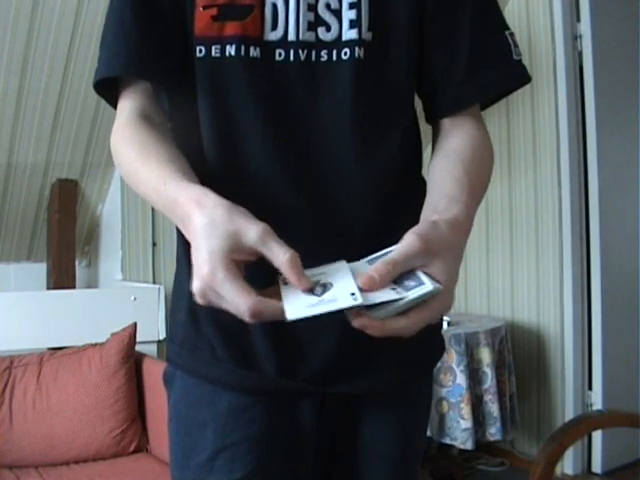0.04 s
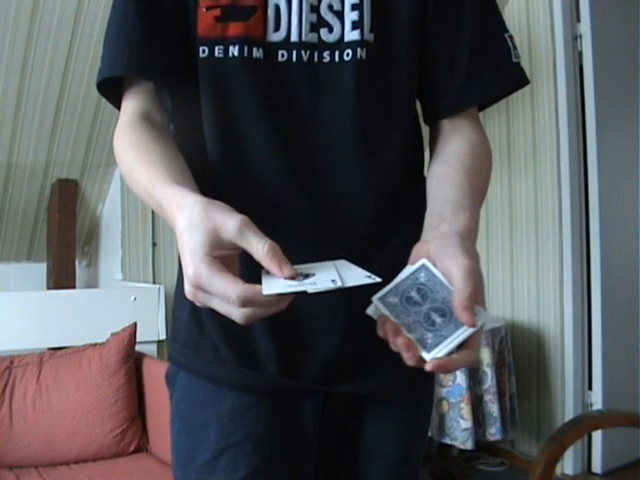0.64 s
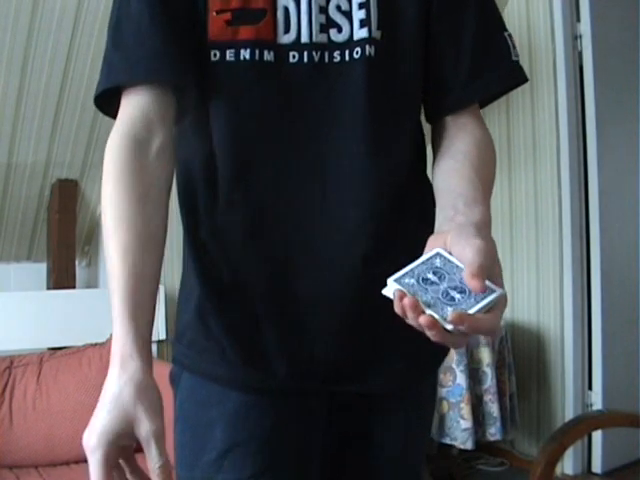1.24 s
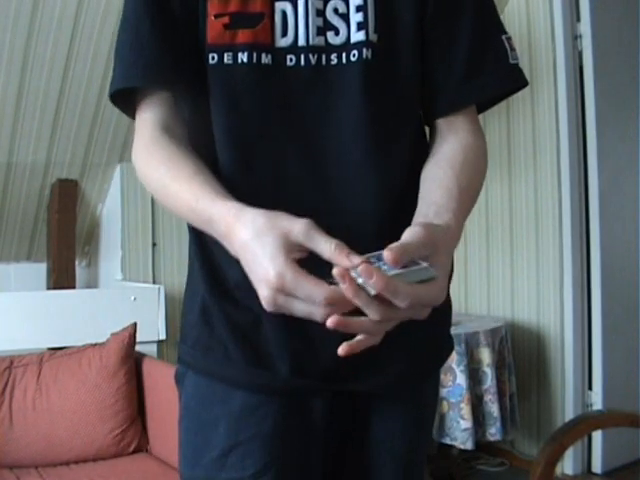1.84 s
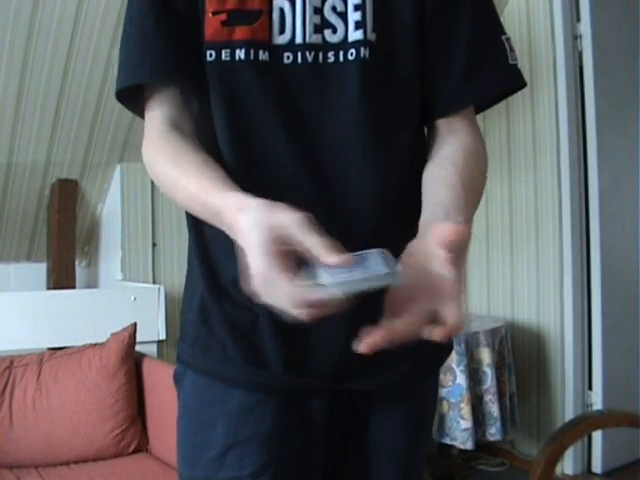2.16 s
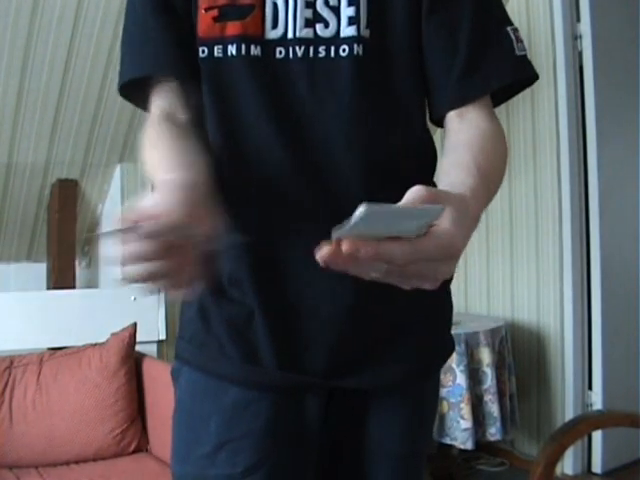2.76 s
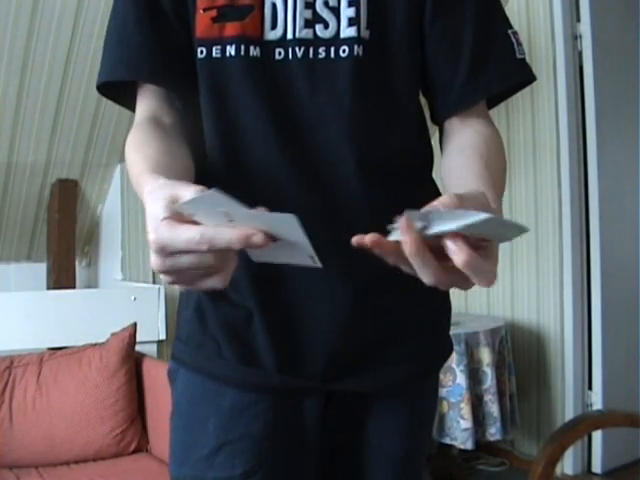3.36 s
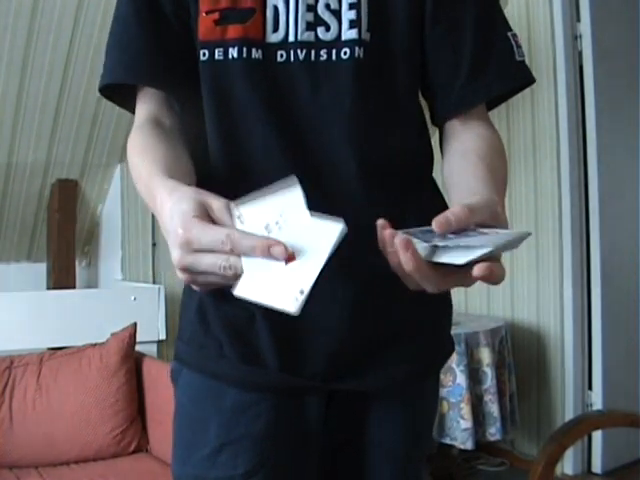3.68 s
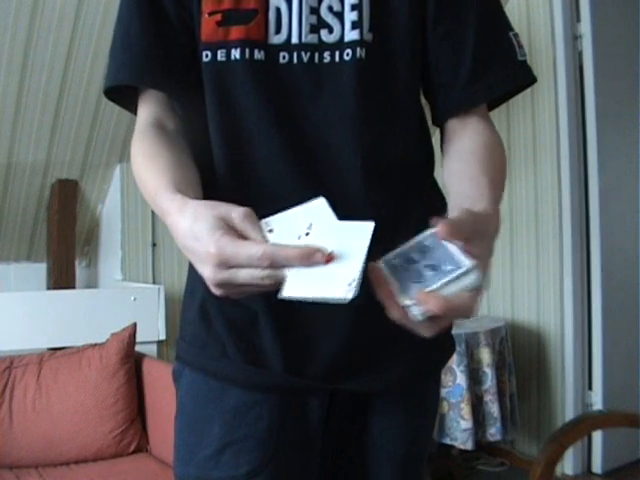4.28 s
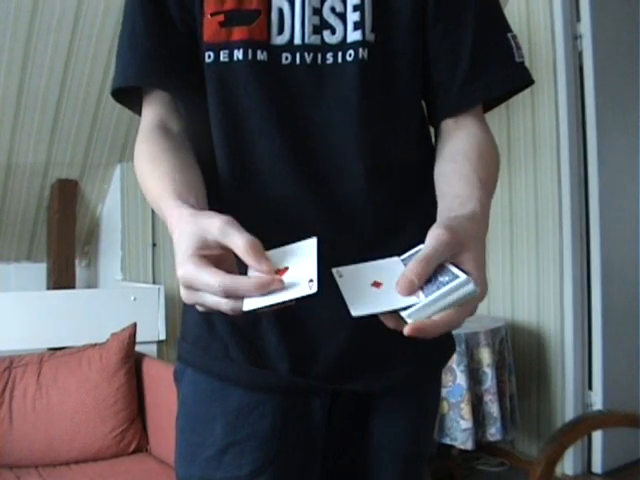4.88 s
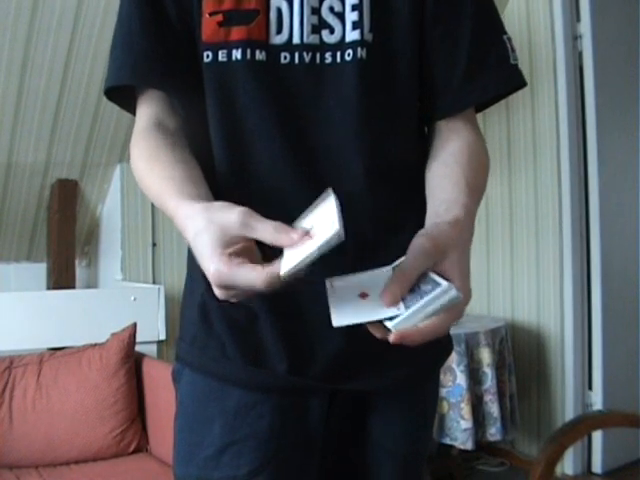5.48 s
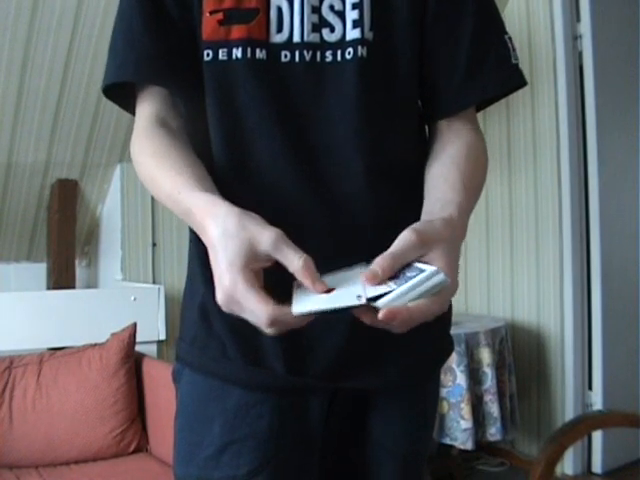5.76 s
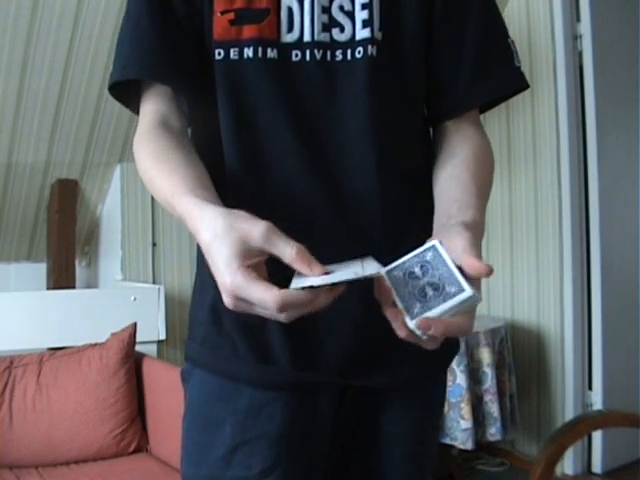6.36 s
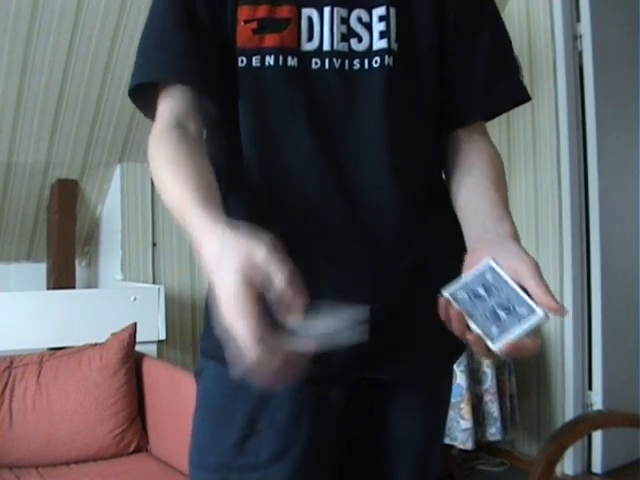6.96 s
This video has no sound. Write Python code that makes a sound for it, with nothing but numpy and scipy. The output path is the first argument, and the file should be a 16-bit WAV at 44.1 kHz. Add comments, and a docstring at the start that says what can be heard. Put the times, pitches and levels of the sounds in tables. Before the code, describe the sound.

Playing cards are handled near the microphone in a small room with short, close reflections. A faint fan murmur and a thin microphone whine run underneath. Soft card rubs and light ticks fill the first second. At about 1.6 seconds a packet claps hollowly into the palm with a few clicks. Small ticks come near 2.4 seconds and a brisk slide with a snap at 2.8, followed by a very faint fingertip squeak around 3.2 and a tiny edge zip at 3.6. From 4.7 seconds the rubs and clicks grow busier. A loud snap at 5.3 thumps the microphone with a puff of air, and a quick cluster of sharp snaps peaks at 5.6. Lighter ticks and soft slides trail off until about 7 seconds. Something close to the microphone knocks lightly at about 1, 4.4 and 6 seconds.

```python
"""Playing cards handled in a small room: they rub off the deck, snap and tick as they flick, touch and
settle, and clap into the palm as a packet. A fingertip squeaks, an edge zips, and one loud snap's puff
of air thumps the microphone. Walls and furniture answer within milliseconds. A fan murmurs,
the microphone whines faintly, and something close to it knocks lightly three times."""
import sys
import numpy as np
from scipy import signal
from scipy.fft import rfft, irfft
from scipy.io import wavfile

SR = 44100
rng = np.random.default_rng(int(sys.argv[2]) if len(sys.argv) > 2 else 0)


def store_pcm(level_fs):
    """Save levels as 16-bit WAV."""
    pcm = np.round(np.clip(level_fs, -1, 1) * 32767).astype(np.int16)
    wavfile.write(sys.argv[1], SR, np.atleast_2d(pcm).T)


N = 310023
TIME = np.arange(N) / SR


def amp(db):
    """Decibels to gain."""
    return 10 ** (np.asarray(db) / 20)


def unit(x):
    """Scale to rms 1."""
    return x / np.sqrt(np.mean(x ** 2) + 1e-20)


def curve_at(points, hz):
    """Interpolate a table over log frequency."""
    freq_hz, value = np.transpose(points)
    return np.interp(np.log(hz + 1), np.log(freq_hz + 1), value)


def pulse(spectrum, size=2048):
    """Minimum-phase pulse with the given spectrum, peak 1."""
    log_gain = np.log(amp(curve_at(spectrum, abs(np.fft.fftfreq(size, 1 / SR)))))
    wave = np.fft.ifft(np.exp(np.conj(signal.hilbert(log_gain)))).real[:size // 2]
    return wave / abs(wave).max()


def strike(starts_s, levels_db, sound):
    """One copy of the sound per start and level."""
    blows = np.zeros(N)
    blows[np.round(np.asarray(starts_s) * SR).astype(int)] = amp(levels_db)
    return signal.oaconvolve(blows, sound)[:N]


def ring(modes, size=16384):
    """Sum of decaying sines."""
    t = TIME[:size]
    return sum(amp(db) * np.exp(-np.log(1000) * t / t60_s) * np.sin(2 * np.pi * hz * t)
               for hz, db, t60_s in modes)


def stereo_pair(a, b, correlation):
    """Two correlated channels from two independent signals."""
    mid = a * np.sqrt((1 + correlation) / 2)
    side = b * np.sqrt((1 - correlation) / 2)
    return np.array([mid + side, mid - side])


# noise floor: freq_hz, density_db
FLOOR_SPECTRUM = [(20, -7.5), (42, -3), (60, 5.5), (85, -7), (160, -7), (330, -7.5), (750, -8),
                  (1400, -11.5), (2000, -13.5), (4400, -19.5), (7300, -22.5), (10000, -28), (14000, -34.5),
                  (16000, -41)]
# its stereo width: freq_hz, correlation
FLOOR_CORRELATION = [(30, 0.72), (65, .95), (110, 0.65), (190, -0.77), (330, -0.099), (780, -0.3),
                     (940, 0.19), (1250, -0.79), (1700, -0.069), (4000, -0.3), (9000, 0.23)]
# its balance: freq_hz, left_minus_right_db
FLOOR_BALANCE = [(60, 0.5), (180, 0.5), (550, 2.5), (1650, 2.5), (4970, -1.5), (15000, -2.5)]
# fan housing resonances: freq_hz, width_hz, lift_db
FAN_RESONANCES = [(315.3, 5.9, 10), (594.5, 27, 7.5), (938.4, 29, 7.5), (999, 116, 9.5), (1646, 100, 6),
                  (1997, 83, 6), (2710, 115, 6)]
# electrical whines: pitch_hz, level_db
WHINES = [(2697, -77), (3090, -77.5), (3736, -78.5), (5448, -81), (7736, -80), (10557, -88)]
def background(floor_db=-51, waver_db=.5, waver_hz=12, whine_trim_db=-1):
    """Room rumble, a fan in its resonant housing, microphone hiss and thin whines."""
    hz = np.fft.rfftfreq(N, 1 / SR)
    fan_db = sum(lift_db / (1 + (2 * (hz - freq_hz) / width_hz) ** 2)
                 for freq_hz, width_hz, lift_db in FAN_RESONANCES)
    colour_db = curve_at(FLOOR_SPECTRUM, hz) + fan_db
    balance_db = np.array([[.5], [-.5]]) * curve_at(FLOOR_BALANCE, hz)
    noise = stereo_pair(*rfft(rng.standard_normal((2, N))), curve_at(FLOOR_CORRELATION, hz))
    floor = unit(irfft(noise * amp(colour_db + balance_db), N))
    waver = unit(irfft(rfft(rng.standard_normal(N)) / (1 + (hz / waver_hz) ** 2), N))
    whine = sum(amp(db + whine_trim_db) * np.sin(2 * np.pi * (pitch_hz * TIME + rng.random()))
                for pitch_hz, db in WHINES)
    return amp(floor_db + waver_db * waver) * floor + np.sqrt(2) * whine


def friction(spectrum, grains_per_s, smooth, grit_db=3):
    """Paper fibres catch and let go: uneven tiny clicks over a smooth rub."""
    catches = (rng.random(N) < grains_per_s / SR) * rng.standard_normal(N)
    catches *= amp(grit_db * rng.uniform(-1.8, 1.8, N))
    rub = unit(catches) + smooth * rng.standard_normal(N)
    return unit(signal.oaconvolve(rub, pulse(spectrum))[:N])


def stroke(peak_s, rise_s, fall_s, drop_db=13):
    """A rub speeds up and slows: its sample span and relative speed."""
    span = slice(*np.searchsorted(TIME, [peak_s - 4 * rise_s, peak_s + 4 * fall_s]))
    from_peak = np.maximum((peak_s - TIME[span]) / rise_s, (TIME[span] - peak_s) / fall_s)
    return span, amp(-drop_db * from_peak ** 1.05)


def stirring(swing_db=5.5, knots_per_s=4.05):
    """Restless fingers: a randomly wandering gain."""
    knots = rng.standard_normal(256)
    return amp(swing_db * np.interp(TIME * knots_per_s, np.arange(len(knots)), knots))


# card rubbing on card: peak_s, length_s, hiss_db, rasp_over_hiss_db
SLIDES = [(.005, .044, -55, 5.5), (0.164, 0.12, -49.5, -1), (0.423, .025, -47.5, -2.5),
          (0.449, .06, -53, 0.5), (0.955, 0.032, -57.5, -4), (.99, 0.036, -58, -12),
          (1.435, 0.053, -61.5, -9), (1.572, 0.12, -56, 1), (1.981, 0.067, -54.5, -3),
          (2.044, .05, -56.5, 3), (2.814, 0.065, -39, -3.5), (2.826, .024, -31.5, 3),
          (2.863, 0.055, -48.5, 6.5), (3.114, 0.023, -53, 7.5), (3.21, .028, -55, -7),
          (3.416, 0.15, -59, 5), (3.617, 0.088, -48, -3), (4.724, 0.048, -51, 10.5),
          (4.84, 0.14, -57.5, 1.5), (4.881, 0.039, -46.5, 1.5), (4.928, 0.049, -46.5, 1.5),
          (5.095, 0.11, -59, 4.5), (5.296, 0.074, -45.5, 1), (5.321, 0.016, -32, 4), (5.562, .022, -28, 0),
          (5.597, 0.044, -40, 12), (5.73, 0.026, -38.5, 1), (5.823, 0.16, -58, 3), (5.966, 0.064, -55, -15),
          (6.108, 0.13, -59, 4.5), (6.205, 0.1, -50.5, 2), (6.438, 0.034, -58.5, 3),
          (6.973, 0.063, -49, -15)]
# short rub at each snap: rise_s, fall_s, hiss_over_crack_db, rasp_over_pop_db
RELEASE_RUB = (0.0115, 0.03, -30.5, -13)
# low and high friction bands: freq_hz, level_db
RASP_SPECTRUM = [(60, -29), (200, -3.5), (400, -6), (900, 0.5), (1700, 6), (3000, 3.5), (4200, -0.5),
                 (8000, -50.5)]
HISS_SPECTRUM = [(1000, -20.5), (2800, -3.5), (3800, 2), (5200, 1.5), (7200, 3.5), (9500, -2), (12500, -5),
                 (15000, -19)]
def slides(rise_share=.47, rasp_trim_db=-7, hiss_trim_db=-1.5, stir_rasp_db=-73, stir_hiss_db=-72):
    """Friction of sliding cards, of each snap's release and of the fingers in between."""
    rubs = [(peak_s, length_s * rise_share, length_s * (1 - rise_share), hiss_db, hiss_db + over_db)
            for peak_s, length_s, hiss_db, over_db in SLIDES]
    rise_s, fall_s, hiss_over_db, rasp_over_db = RELEASE_RUB
    rubs += [(start_s, rise_s, fall_s, crack_db + hiss_over_db, pop_db + rasp_over_db)
             for start_s, crack_db, pop_db, _ in SNAPS]
    stir = stirring()
    rasp_power = (amp(stir_rasp_db) * stir) ** 2
    hiss_power = (amp(stir_hiss_db) * stir) ** 2
    for peak_s, rise_s, fall_s, hiss_db, rasp_db in rubs:
        span, speed = stroke(peak_s, rise_s, fall_s)
        rasp_power[span] += (amp(rasp_db + rasp_trim_db) * speed) ** 2
        hiss_power[span] += (amp(hiss_db + hiss_trim_db) * speed) ** 2
    rasp = np.sqrt(rasp_power) * friction(RASP_SPECTRUM, grains_per_s=1500, smooth=.87)
    hiss = np.sqrt(hiss_power) * friction(HISS_SPECTRUM, grains_per_s=1800, smooth=.53)
    return rasp + hiss


# echoes off the sloping ceiling and walls: delay_s, level_db
REFLECTIONS = [(.0042, -11), (.0058, -14), (.0088, -25), (0.015, -15.5)]
def first_reflections(x, cutoff_hz=7000):
    """Single echoes, slightly duller than the direct sound."""
    dull = signal.sosfilt(signal.butter(1, cutoff_hz, fs=SR, output="sos"), x)
    return sum(amp(db) * np.interp(TIME - delay_s, TIME, dull, left=0) for delay_s, db in REFLECTIONS)


# reverberation colour: freq_hz, gain_db
ROOM_SPECTRUM = [(60, -17), (170, -4), (260, 4), (500, 5), (650, 7), (1000, 9.5), (1750, 2), (2500, 5),
                 (5000, -1), (12000, -3.5)]
# tail decay: freq_hz, t60_s
ROOM_DECAY = [(200, 0.39), (600, 0.18), (1500, 0.2), (3700, 0.25), (7000, 0.15), (12000, 0.12)]
# furniture and corner resonances: freq_hz, level_db, t60_s
FURNITURE_MODES = [(242.8, -51.5, 0.25), (390.3, -47, 0.21), (566.5, -43.5, 0.14), (753, -35.5, 0.09),
                   (864, -45.5, 0.12), (1320, -40.5, 0.11), (2048, -42.5, 0.096)]
def room(x, gap_s=.0028, taps_per_s=6000, early_t60_s=.016, early_db=-5.5, late_db=-4.5, size=16384):
    """Near reflections, a short tail and ringing furniture at two close microphone ports."""
    t = TIME[:size]
    taps = rng.choice([-1., 1.], (2, size)) * (rng.random((2, size)) < taps_per_s / SR) * (t > gap_s)
    taps = stereo_pair(*taps, correlation=.67)
    early = taps * np.exp(-np.log(1000) * np.maximum(t - gap_s, 0) / early_t60_s)
    hz, frame_s, bands = signal.stft(taps, SR, nperseg=128)
    t60_s = curve_at(ROOM_DECAY, hz)[:, None]
    bands = bands * np.exp(-np.log(1000) * frame_s / t60_s) / np.sqrt(t60_s)
    late = signal.istft(bands, SR)[1][:, :size]
    echoes = (amp(early_db) * unit(early) + amp(late_db) * unit(late)) / np.sqrt(size)
    colour = amp(curve_at(ROOM_SPECTRUM, np.fft.rfftfreq(2 * size, 1 / SR)))
    response = irfft(rfft(echoes, 2 * size) * colour)[:, :size]
    response += ring(FURNITURE_MODES) * np.minimum(t / gap_s, 1)
    return signal.fftconvolve(x[None], response, axes=1)[:, :N]


def drifting_room(x, patterns=5, step_s=.05):
    """The hands keep moving, so the sound crossfades through a cycle of reflection patterns."""
    distance = abs((TIME / step_s - np.arange(patterns)[:, None] + 1) % patterns - 1)
    shares = np.cos(np.pi / 2 * np.minimum(distance, 1))
    return sum(room(x * share) for share in shares)


# snaps and light ticks as cards flick, touch, catch and settle: start_s, crack_db, pop_db, puff_db
SNAPS = [(0.2779, -36, -42, -63), (.810, -42.5, -60, -66), (1.5638, -33, -31.5, -40),
         (1.572, -42, -29, -53), (1.6047, -23.5, -26, -38), (1.6232, -29, -45, -54),
         (2.388, -44, -39.5, -46.5), (2.398, -30.5, -45, -62), (2.480, -43, -41, -50),
         (2.821, -29, -30, -35.5), (3.247, -39, -46, -50), (4.7253, -31, -38.5, -44),
         (4.876, -29.5, -43, -50), (4.898, -34, -34.5, -35), (4.9383, -21.5, -36, -46),
         (5.2132, -20.5, -23.5, -27.5), (5.3231, -2.5, -11.5, -20), (5.526, -11, -24, -30.5),
         (5.565, -10, -24, -32.5), (5.581, -17, -23, -24), (5.589, 1, -11, -31.5), (5.593, -22, -31, -39),
         (5.714, -29, -32, -49), (5.725, -27, -26.5, -31), (5.9486, -34, -58, -59),
         (6.954, -34, -61.5, -64)]
# edge crack, face pop, air puff: freq_hz, level_db
CRACK_SPECTRUM = [(500, -53.5), (1800, 0), (2800, 2), (4300, -0.5), (6300, 2.5), (8000, -2), (10000, -9.5),
                  (12500, -11), (15000, -26.5)]
POP_SPECTRUM = [(150, -41.5), (370, -5.5), (490, -9), (760, 5), (950, 2.5), (1150, -2), (1900, 0),
                (2700, -10), (4500, -22.5), (12000, -47)]
PUFF_SPECTRUM = [(30, -17), (110, -12.5), (230, -4), (400, 4), (650, -4), (1500, -30), (8000, -82)]
# card face resonances: freq_hz, level_db, t60_s
CARD_MODES = [(755, -0.5, 0.04), (933, -14, 0.058), (1302, -7.5, 0.029), (1480, -13, 0.075),
              (1900, -18, 0.038)]
def snaps(scrape_s=.00056, flutter_s=.0014, scrape_db=-14, ring_db=-18, crack_trim_db=-1, puff_trim_db=-3):
    """The edge scrapes, cracks and flutters; the face pops, rings and pushes out air."""
    starts_s, crack_db, pop_db, puff_db = np.transpose(SNAPS)
    force = np.zeros(N)
    for start_s, db in zip(starts_s, crack_db):
        near = abs(TIME - start_s) < .02
        t = TIME[near] - start_s
        force[near] += amp(db + scrape_db) * np.exp(np.minimum(t / scrape_s, -t / flutter_s))
    scrape = force * friction(CRACK_SPECTRUM, grains_per_s=5300, smooth=.72, grit_db=6)
    crack = strike(starts_s, crack_db + crack_trim_db, pulse(CRACK_SPECTRUM))
    pop = strike(starts_s, pop_db, pulse(POP_SPECTRUM))
    ringing = strike(starts_s, pop_db + ring_db, ring(CARD_MODES))
    puff = strike(starts_s, puff_db + puff_trim_db, pulse(PUFF_SPECTRUM))
    return -(scrape + crack + pop + ringing + puff)


# knocks near the microphone: start_s, level_db
KNOCKS = [(1.0268, -30.5), (4.375, -35.5), (6.037, -30)]
# their resonances: freq_hz, level_db, t60_s
KNOCK_MODES = [(493, -8, 0.048), (686, -32, 0.011), (987, 5.5, 0.037), (1630, -0.5, 0.036)]
def knocks(contact_s=.00038, trim_db=-2, left_lag_s=.00014, right_db=-6):
    """Dry, soft-edged knocks, louder and slightly later on the left."""
    starts_s, levels_db = np.transpose(KNOCKS)
    tock = amp(trim_db) * ring(KNOCK_MODES)
    tock *= 1 - np.exp(-(TIME[:len(tock)] / contact_s) ** 2)
    return np.array([strike(starts_s + left_lag_s, levels_db, tock),
                     strike(starts_s, levels_db + right_db, tock)])


# packet landing in the cupped hand: start_s, level_db
CLAPS = [(1.5622, -48), (1.59, -17)]
# air pocket and card resonances: freq_hz, level_db, t60_s
PACKET_MODES = [(232, -16.5, 0.011), (670, -13.5, 0.018), (925, -4, 0.0087), (1617, -3, 0.012),
                (1920, -1.5, 0.019), (2133, -4, 0.019), (2590, -10.5, 0.015), (3290, -12, 0.012)]
def claps(closing_s=.0016):
    """The packet traps air against the hand: a hollow clack that swells as the gap closes."""
    clack = ring(PACKET_MODES)
    clack *= 1 - np.exp(-(TIME[:len(clack)] / closing_s) ** 2)
    return strike(*np.transpose(CLAPS), clack / abs(clack).max())


# fingertip squeaking on a card: time_s, pitch_hz, level_db
FINGER_SQUEAK = [(3.20, 2650, -70), (3.215, 2600, -62), (3.25, 2650, -84), (3.29, 2584, -62),
                 (3.31, 2570, -70), (3.33, 2610, -78)]
# card edge slowing along the deck: time_s, pitch_hz, level_db
EDGE_ZIP = [(3.565, 11550, -70), (3.58, 10600, -59), (3.60, 9800, -56), (3.62, 8500, -70),
            (3.66, 7600, -79)]
def stick_slip(track, width_hz):
    """Narrow hiss whose pitch follows the speed of the stroke."""
    times_s, pitch_hz, level_db = np.transpose(track)
    lowpass = signal.butter(2, width_hz / 2, fs=SR, output="sos")
    fuzz = unit(signal.sosfilt(lowpass, rng.standard_normal(N)))
    tone = np.sqrt(2) * np.sin(2 * np.pi * np.cumsum(np.interp(TIME, times_s, pitch_hz)) / SR)
    return np.interp(TIME, times_s, amp(level_db), left=0, right=0) * fuzz * tone


# air push on the microphone ports: start_s, left_db, right_db
AIR_THUMP = (5.3232, -16, -12.5)
def air_thump(push_s=.00061):
    """One loud snap's puff of air thumps the microphone, pushing its two ports in opposite directions."""
    start_s, left_db, right_db = AIR_THUMP
    age = TIME[:512] / push_s
    push = age * np.exp(1 - age)
    return np.array([strike([start_s], left_db, push), -strike([start_s], right_db, push)])


def scene():
    """Cards, direct and through the room, with a dry thump and knocks over the steady background."""
    cards = slides() + stick_slip(EDGE_ZIP, width_hz=1300) + stick_slip(FINGER_SQUEAK, width_hz=230)
    cards += snaps() + claps()
    return cards + first_reflections(cards) + drifting_room(cards) + air_thump() + knocks() + background()


def record(dry, ceiling=.9, cutoff_hz=15600):
    """Clip the sharpest peaks, then band-limit."""
    clipped = np.clip(dry, -ceiling, ceiling)
    lowpass = signal.firwin(255, cutoff_hz, window=("kaiser", 9), fs=SR)
    return signal.oaconvolve(clipped, lowpass[None], "same", axes=1)


dry = scene()
out = record(dry)
store_pcm(out)
```